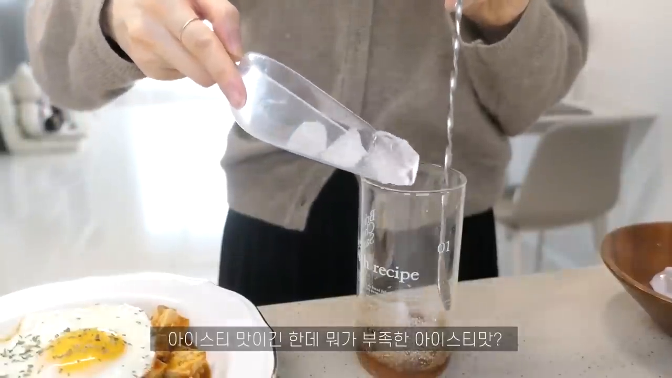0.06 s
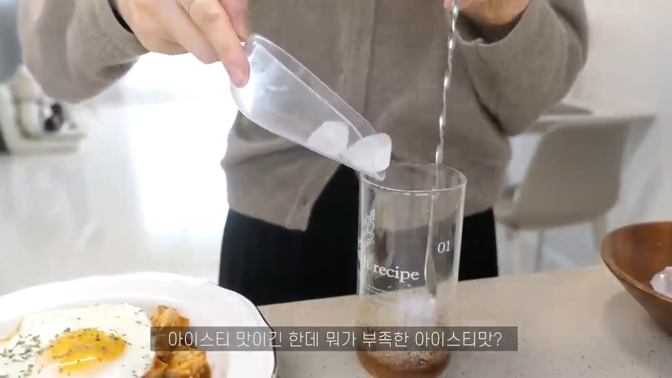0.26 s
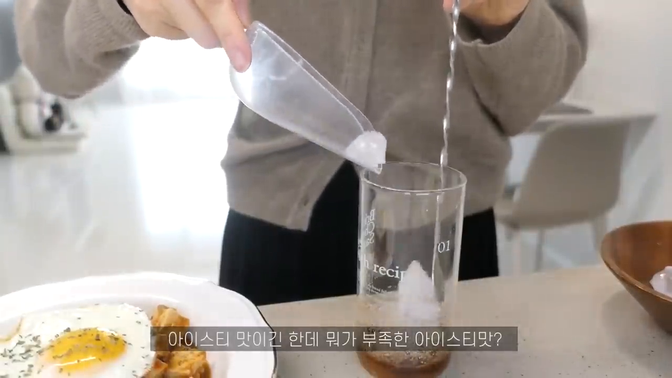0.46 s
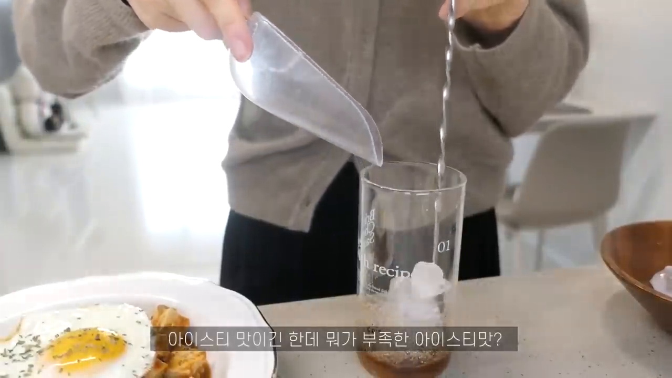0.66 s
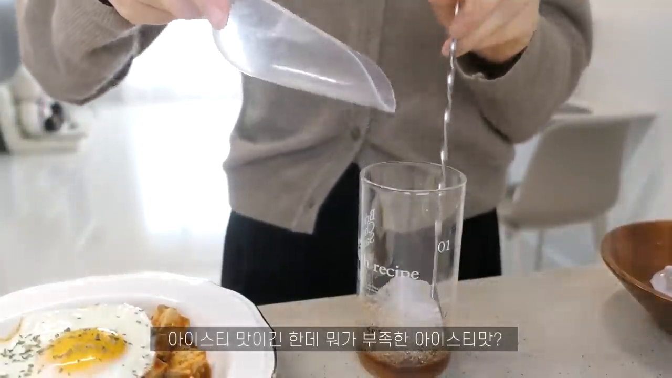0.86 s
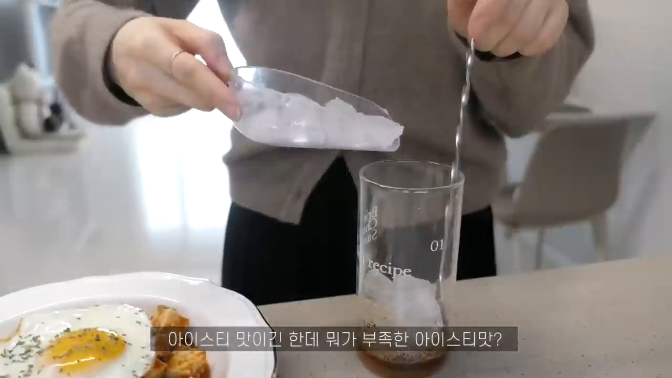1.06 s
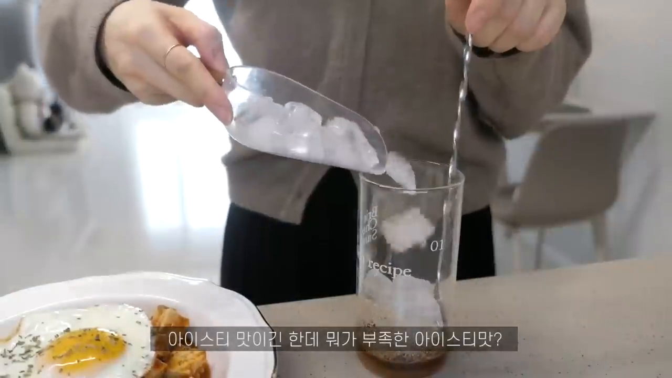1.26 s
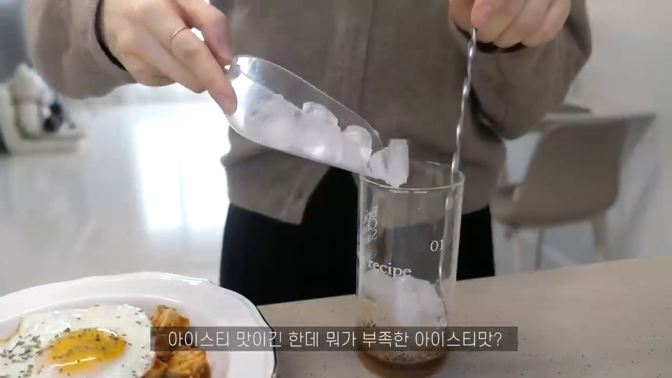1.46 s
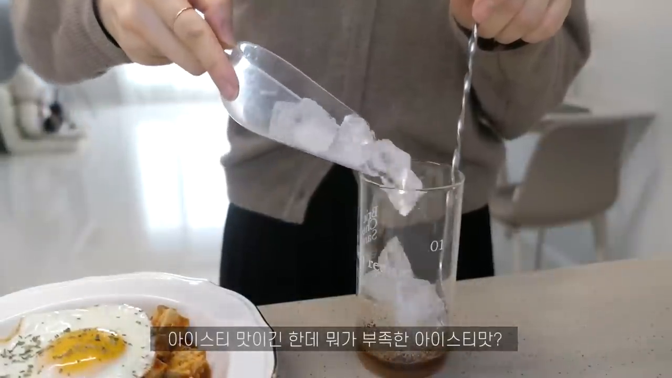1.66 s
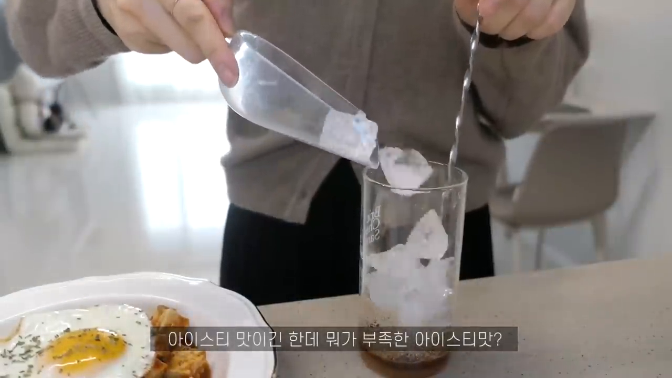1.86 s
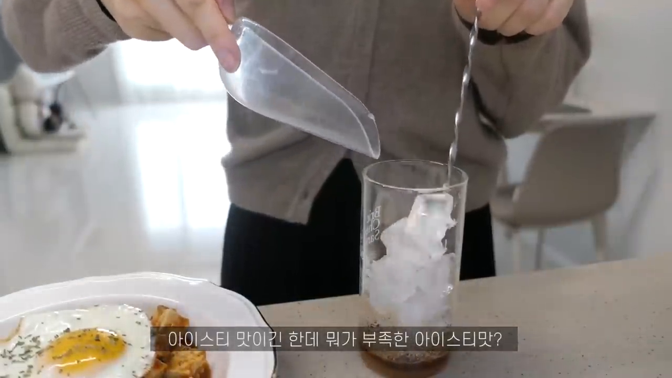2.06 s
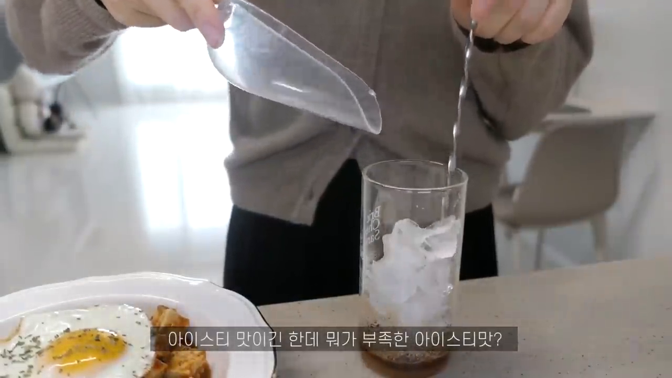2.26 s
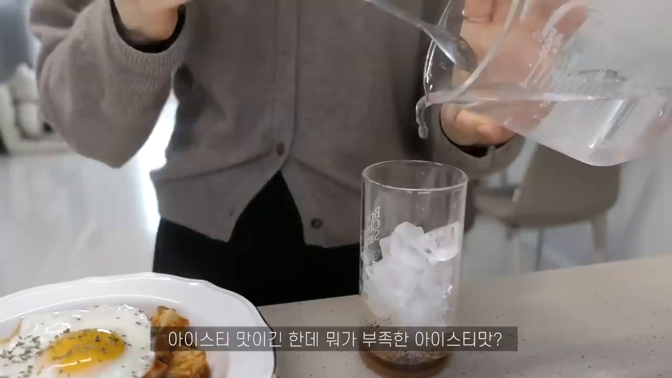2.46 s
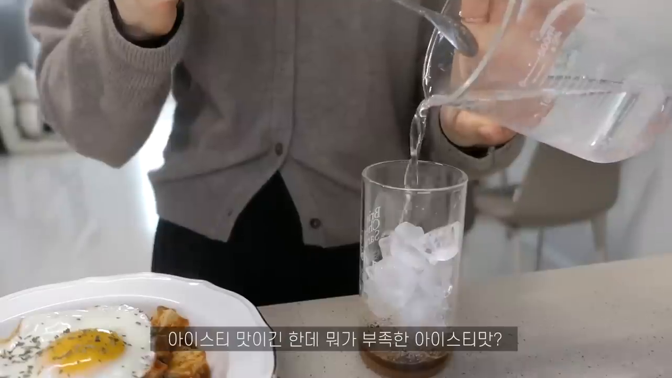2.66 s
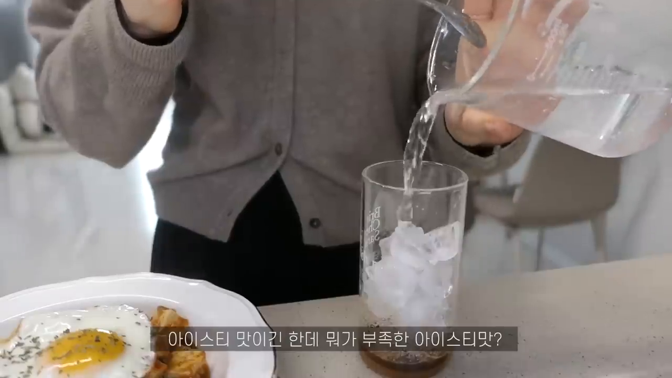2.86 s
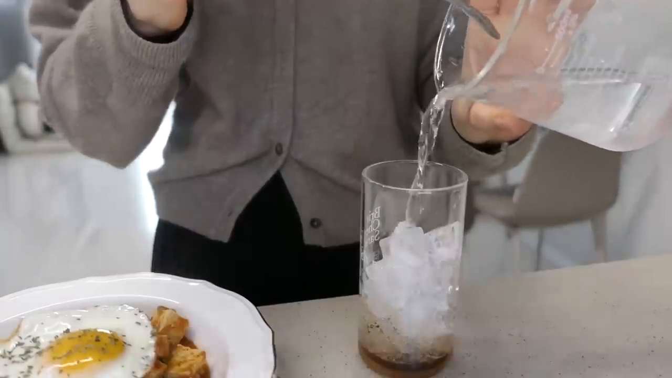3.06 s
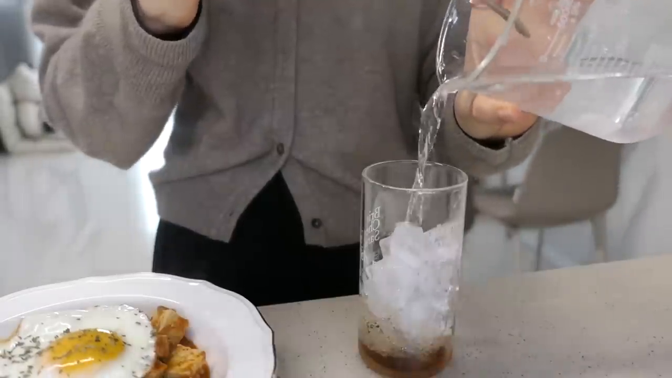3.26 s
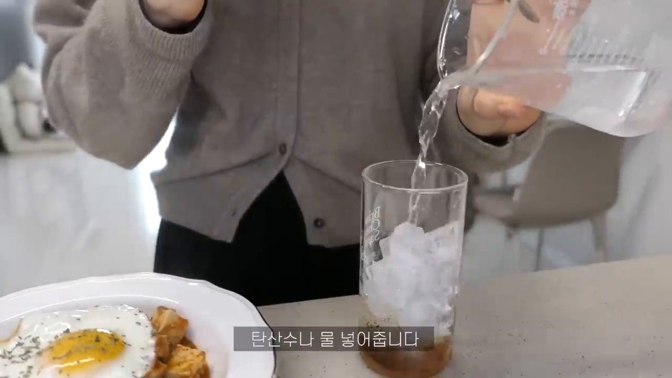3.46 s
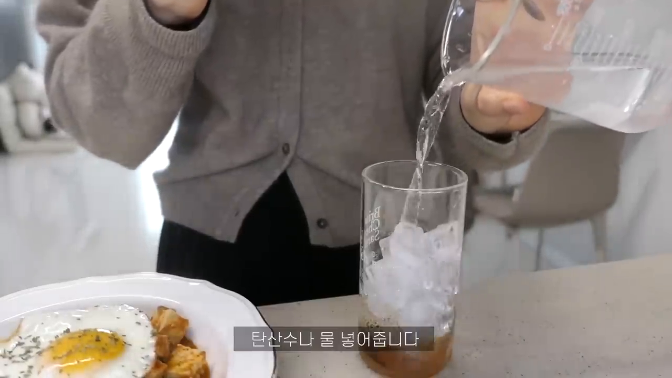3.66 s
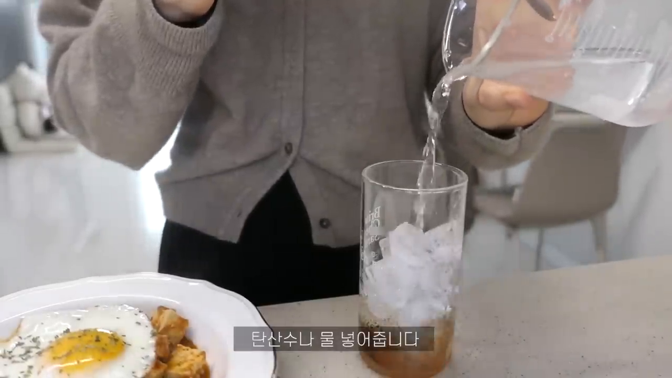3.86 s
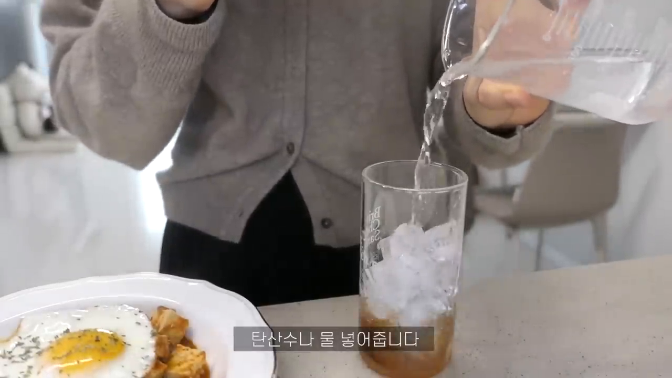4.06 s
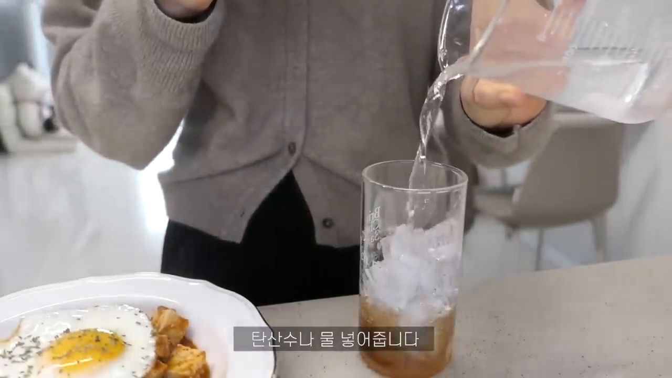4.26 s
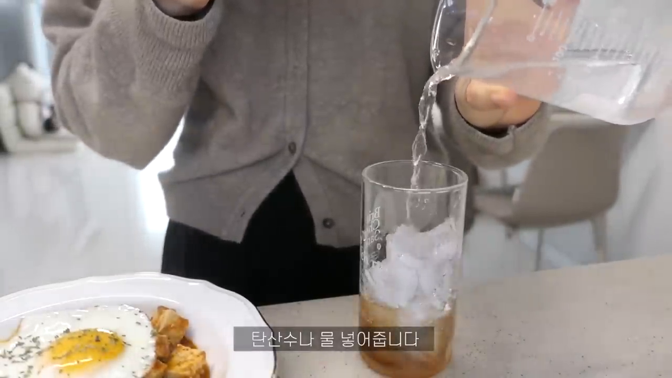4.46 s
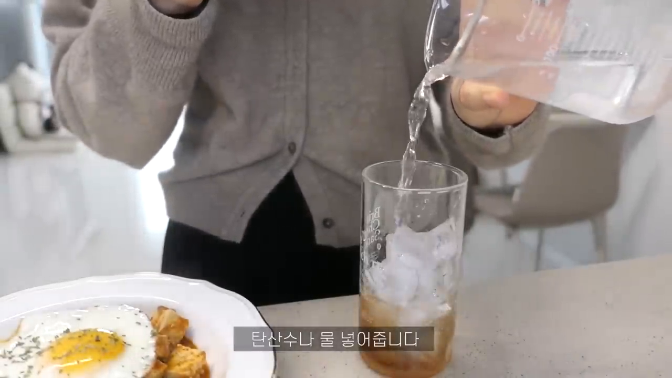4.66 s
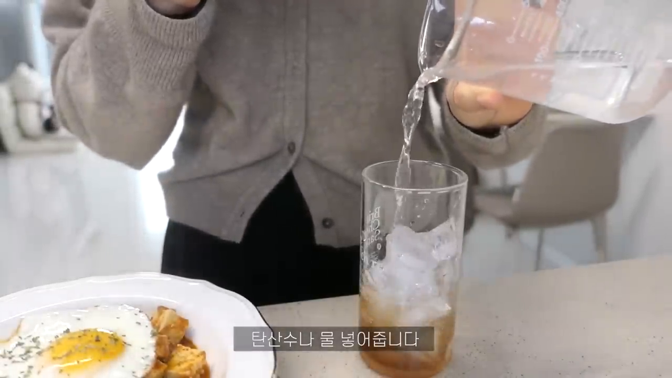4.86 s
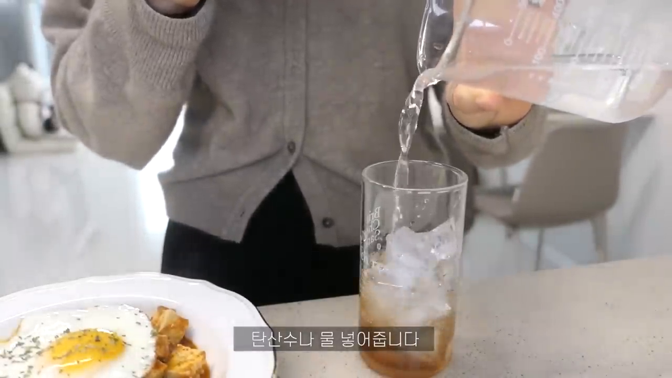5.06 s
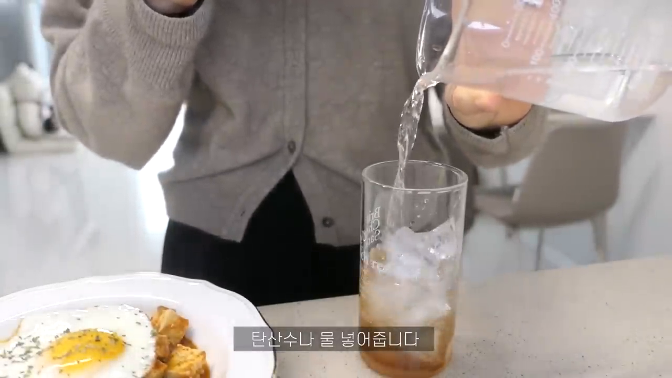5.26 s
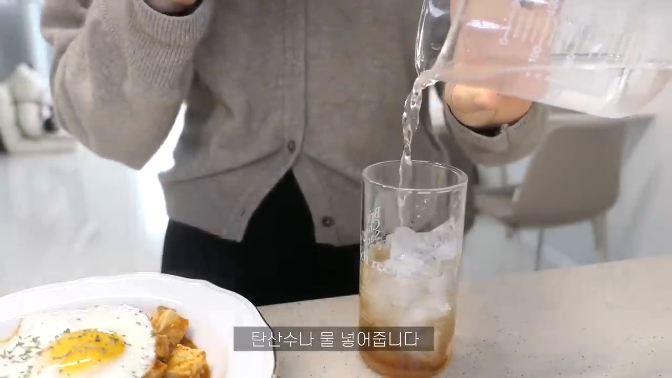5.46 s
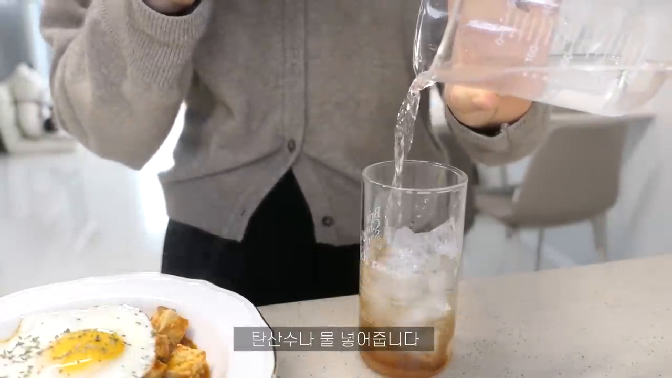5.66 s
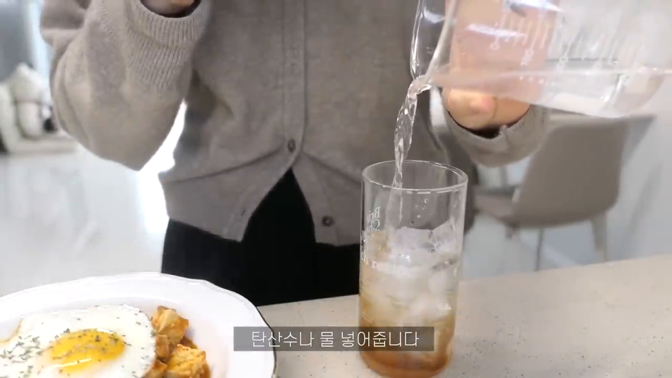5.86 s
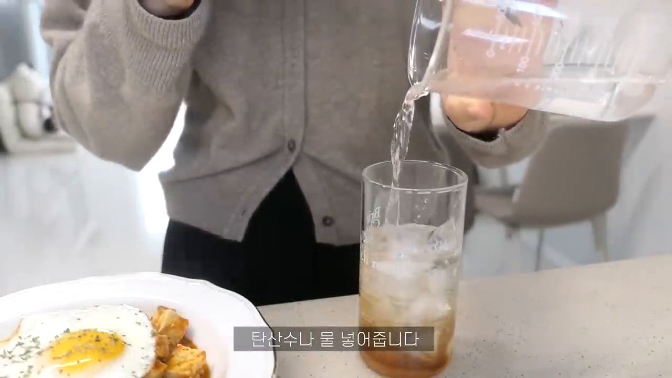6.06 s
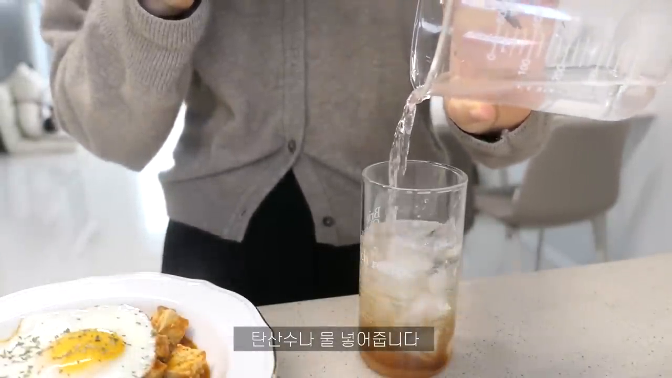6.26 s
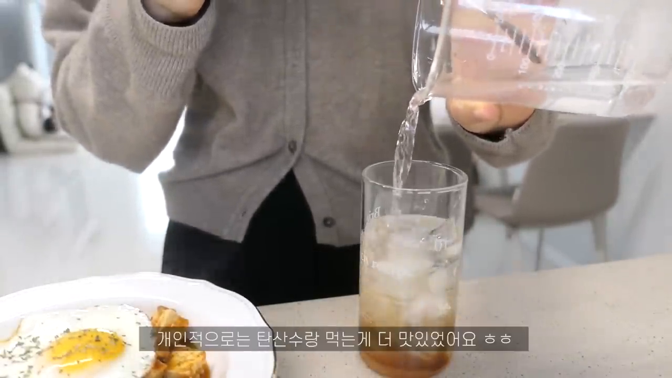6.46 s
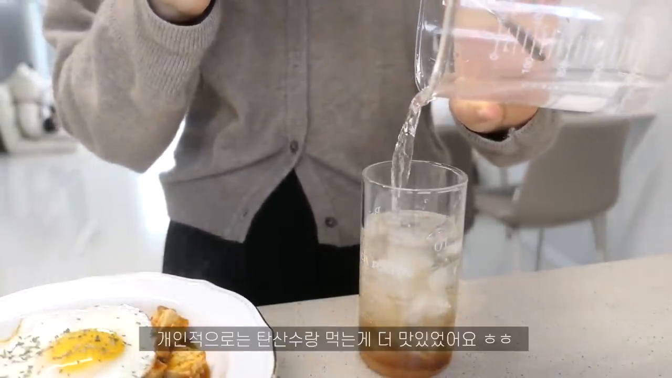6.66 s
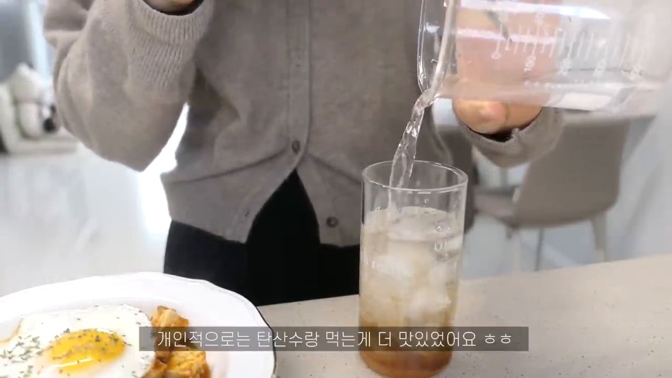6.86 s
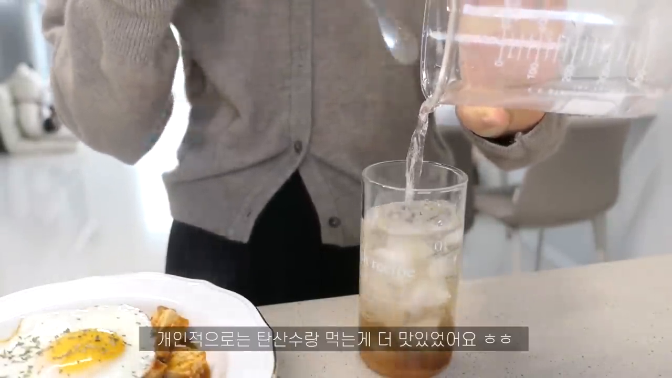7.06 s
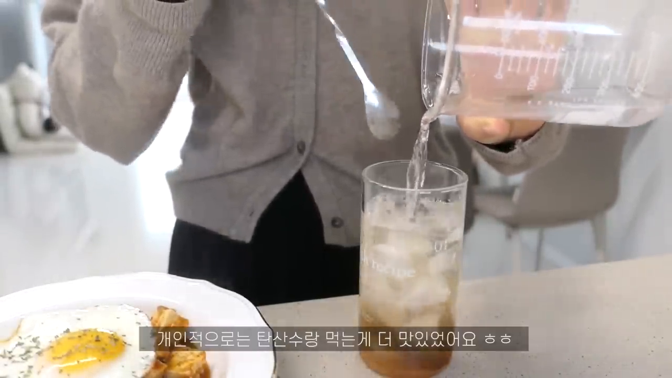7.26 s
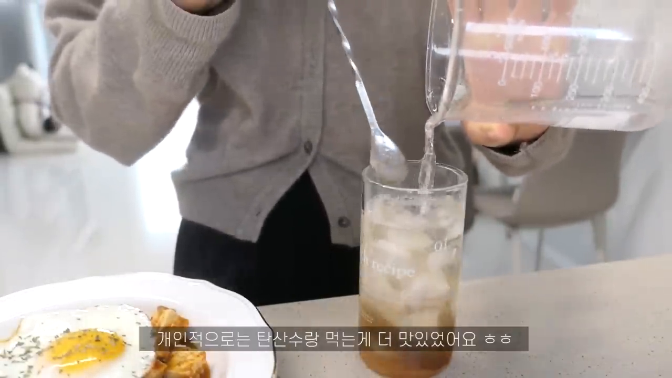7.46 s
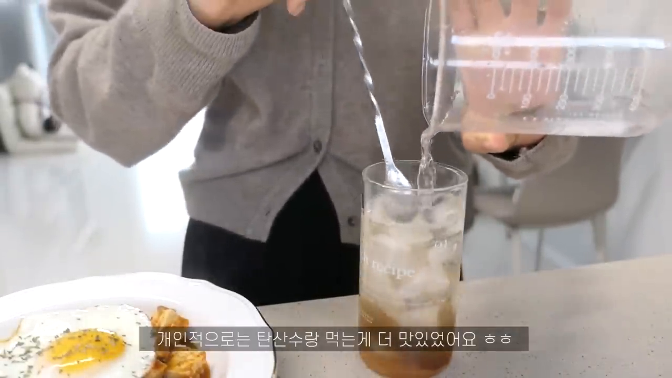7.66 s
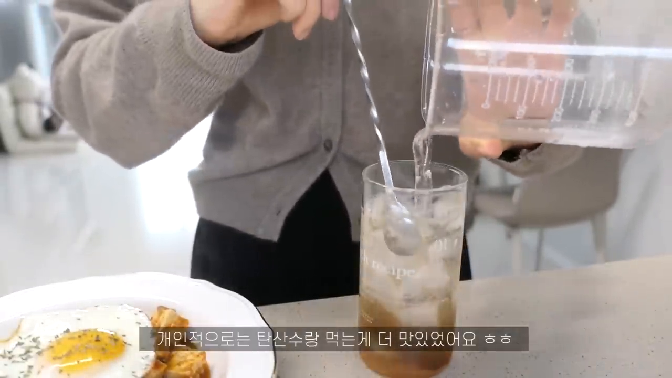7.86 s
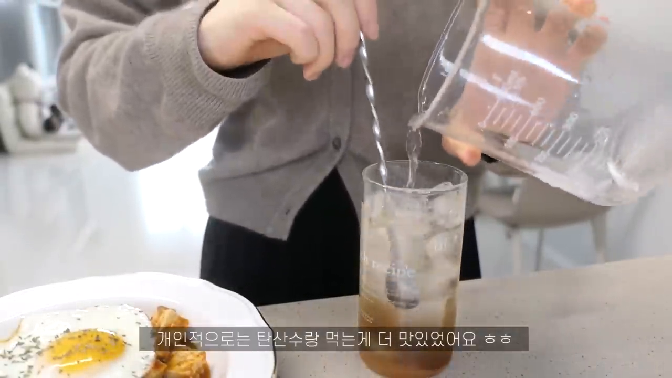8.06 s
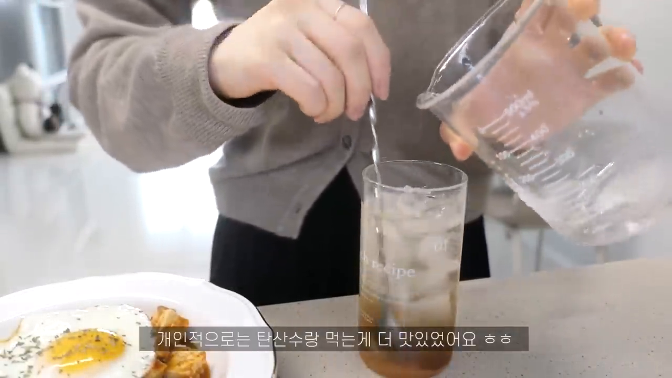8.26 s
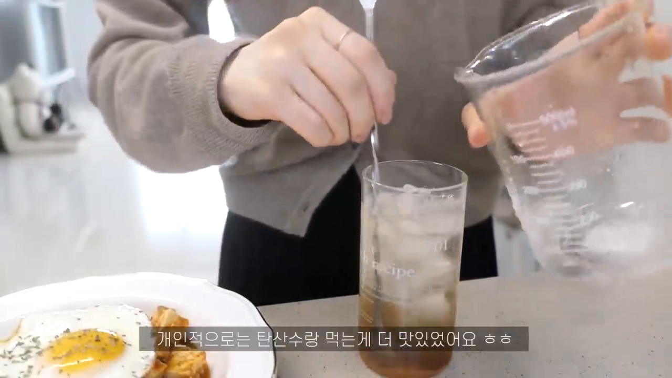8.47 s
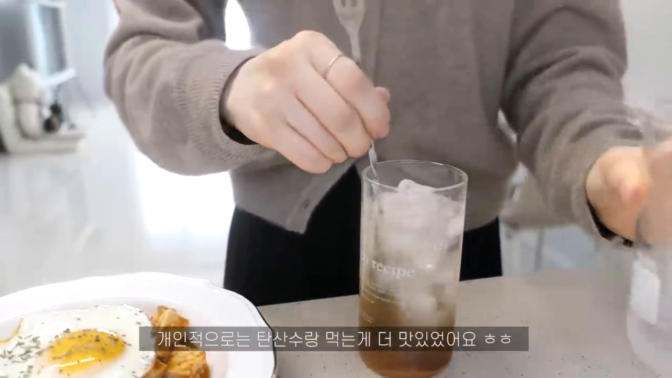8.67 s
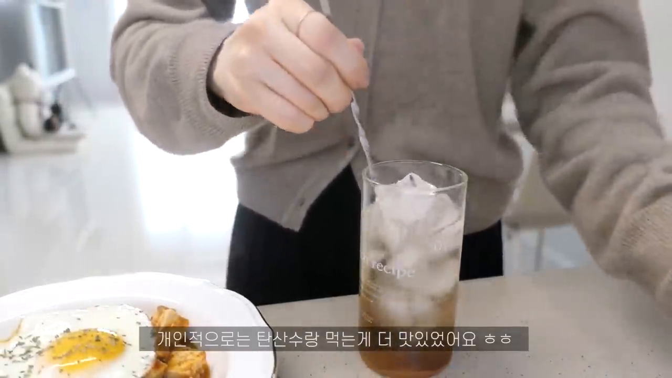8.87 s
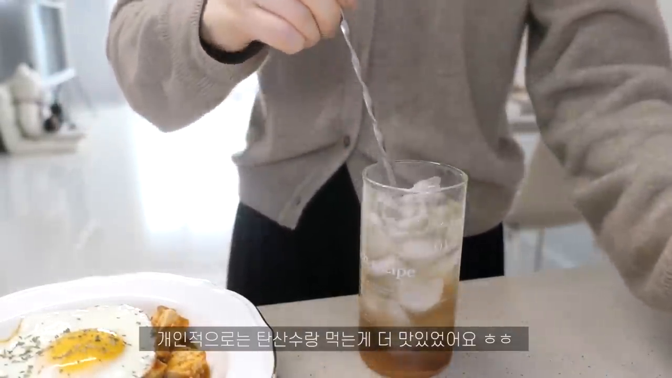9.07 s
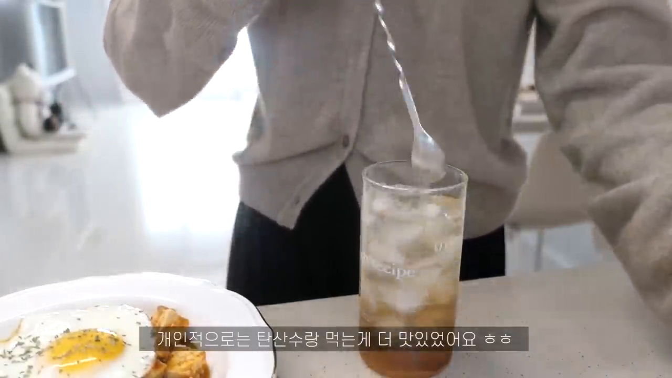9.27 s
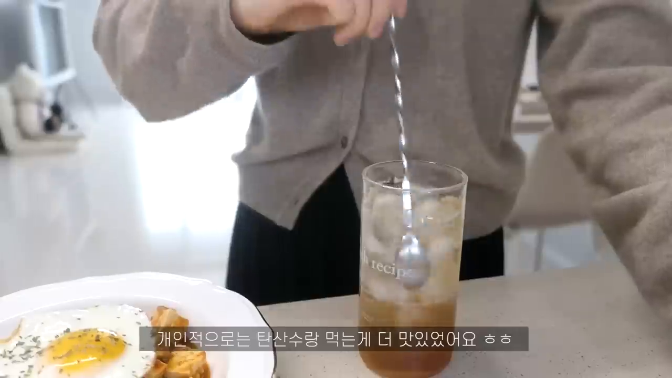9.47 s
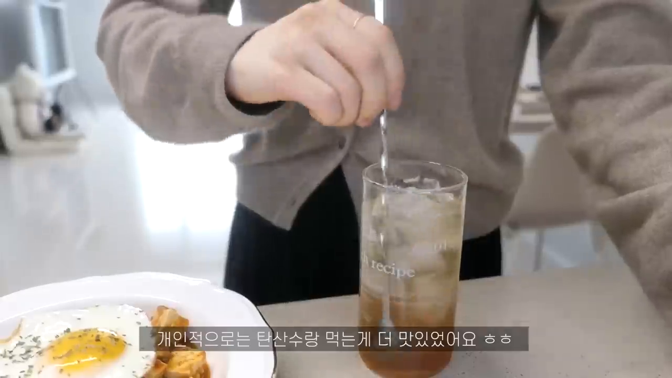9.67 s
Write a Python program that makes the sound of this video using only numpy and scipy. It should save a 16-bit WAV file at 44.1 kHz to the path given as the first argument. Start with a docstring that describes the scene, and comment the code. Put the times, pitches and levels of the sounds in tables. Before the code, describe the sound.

Close stereo microphone in a home kitchen with a short echo and faint fridge hum. Ice cubes clack and ring loudly into a dry tall glass in two loads, with small plastic scoop ticks between. Each load's ringing cuts off abruptly. Much quieter water then trickles, gurgles and splashes over the ice, before a long metal spoon stirs, knocking the cubes dully with bright ticks.

```python
"""First, ice cubes clatter into a tall dry glass in two loads, with ticks in a plastic scoop between:
each blow rings a set of fading tones. The ringing is cut off abruptly twice.
Then water is poured over them: gulps, bubbles and splashes are short chirps, with filtered noise for spray.
Last, a long spoon stirs the full glass: the cubes knock dully and the metal ticks brightly.
A fridge hums all along in a home kitchen that adds a short echo."""
import sys
import numpy as np
from scipy import signal
from scipy.fft import rfft, irfft, next_fast_len
from scipy.io import wavfile
from scipy.ndimage import uniform_filter1d, map_coordinates

SR = 44100
rng = np.random.default_rng(int(sys.argv[2]) if len(sys.argv) > 2 else 0)


def dump(signal):
    """Clip the signal to [-1, 1] and save it as 16-bit WAV at the path in sys.argv[1]."""
    limited = np.clip(np.atleast_2d(signal).T, -1, 1)
    pcm = np.round(limited * 32767).astype(np.int16)
    wavfile.write(sys.argv[1], SR, pcm)


N = 428211

# Levels of single events and tones are relative: each layer adds its own trim.
# the start, the two abrupt cuts in the ringing, and the end: time_s
CUTS = [0, 1.016, 2.502, 9.72]
# cubes hitting the dry glass and each other: start_s, clack_db, wall_ring_db, rim_ring_db, thud_db
DROPS = [(0.0024, -10, -18, -21.5, -15), (0.066, -8, -50.5, -22, -56), (0.0871, -7.5, -22, -40.5, -44),
         (0.0963, -7, -35.5, -24.5, -23), (0.255, -18, -34, -38, -45), (0.264, -3.5, -19, -12.5, -32.5),
         (0.29, -9.5, -47, -42, -25), (0.345, -35, -44, -41.5, -49), (0.369, -32.5, -36.5, -45, -41),
         (0.5077, -10, -38.5, -43, -42), (0.5154, -2, -20.5, -27.5, -24.5),
         (0.5703, -33.5, -40.5, -31.5, -50), (0.6044, -11.5, -29.5, -28, -37),
         (0.614, -3, -25, -19.5, -45.5), (0.7054, -4, -29, -26, -26), (0.8687, -20.5, -31.5, -43, -30.5),
         (0.8862, -23.5, -46, -49, -36.5), (0.9856, -26, -59, -51, -43), (0.999, -11, -37.5, -39, -34),
         (1.362, 1, -19.5, -37.5, -19), (1.3846, -7.5, -23, -26, -32.5), (1.4182, -11, -34, -31, -25.5),
         (1.4312, -13, -25, -25, -45), (1.47, -16.5, -61, -30, -34), (1.5296, -26, -48, -46.5, -30.5),
         (1.58, -36, -42.5, -48, -47), (1.614, -3.5, -24.5, -33.5, -29), (1.6432, -3, -28, -21, -21.5),
         (1.7102, -8, -32.5, -21, -46), (1.738, -16, -27, -20.5, -28), (1.785, -1.5, -31.5, -27, -33),
         (1.8079, -14.5, -35.5, -26.5, -31.5), (1.8241, -8.5, -50, -27, -29),
         (1.8532, -15.5, -29, -23.5, -29.5), (1.8767, -5, -25.5, -21, -25),
         (1.8948, -7.5, -23.5, -31.5, -21.5), (1.9102, -8, -54, -30, -33), (1.9622, -19, -32.5, -25.5, -27),
         (1.9749, -12, -24, -32, -24.5), (2.0018, -7.5, -43, -41, -21), (2.0179, -3.5, -39, -30, -27.5),
         (2.0659, -9, -41.5, -29, -25), (2.0868, -8.5, -22, -22, -17.5), (2.11, -15.5, -54, -34, -24),
         (2.164, -6.5, -30, -19.5, -45), (2.2414, -15, -42, -31, -31.5), (2.415, -8, -30.5, -57, -23)]
# cubes ticking in the plastic scoop: start_s, level_db, pitch_hz
SCOOP_TICKS = [(1.072, -33, 1390), (1.111, -15.5, 2100), (1.1398, -41, 4800), (1.1856, -14, 3800),
               (1.239, -20, 2050), (1.2528, -23.5, 2080), (1.303, -15.5, 3650), (1.314, -23.5, 1410)]
# tones of ice cubes clacking in the dry glass: pitch_hz, width_hz, level_db
DRY_CLACK = [(2040, 480, -9), (2770, 1400, 3), (4090, 580, -0.5), (5290, 590, -5), (6150, 600, -4),
             (7380, 300, -8.5), (8060, 930, -6), (12200, 230, -26.5)]
# close-packed tones that every dry clack shakes: pitch_hz, width_hz, level_db
SHIMMER = [(4710, 40, -4), (4785, 30, 0), (4870, 35, 2), (4950, 25, 0), (5023, 16, -2), (5090, 30, 0),
           (5200, 45, -1), (2945, 30, -12), (5770, 50, -11), (6400, 40, -9), (7450, 30, -6), (8200, 45, -7),
           (8650, 40, -8), (10050, 40, -10), (12100, 45, -10)]
# low ring of the dry glass wall: pitch_hz, width_hz, level_db
WALL_RING = [(1411, 12, -3), (1815, 70, 0), (2120, 70, -4), (2313, 100, -8.5), (2560, 96, -9)]
# high ring of the dry glass rim: pitch_hz, width_hz, level_db
RIM_RING = [(3911, 6, 0), (7404, 14, -12), (8090, 18, -19), (10310, 16, -20), (12400, 14, -19),
            (13850, 12, -27)]
# thud of the air in the dry glass: pitch_hz, width_hz, level_db
DRY_THUD = [(578, 79, -11), (720, 147, -0.5), (960, 350, -4)]
# the worktop under the glass: pitch_hz, width_hz, level_db
WORKTOP = [(119, 61, -2.5), (275.2, 35, -3), (329, 45, -13)]
# the water jet: time_s, gurgle_db, spray_db
JET = [(2.5, -79, -97), (2.6, -66, -62.5), (2.92, -80, -92), (3.02, -77, -69), (3.42, -83.5, -75.5),
       (3.63, -58.5, -64), (4.29, -55, -59), (4.45, -56, -55), (4.8, -46, -51.5), (5.1, -42.5, -48.5),
       (5.19, -34.5, -52), (5.36, -46.5, -48.5), (5.55, -36.5, -55.5), (5.76, -31.5, -54.5),
       (6.0, -39.5, -50.5), (6.18, -31.5, -54.5), (6.44, -43.5, -58), (7.25, -47.5, -61.5),
       (7.48, -73.5, -63.5), (7.9, -79, -67.5)]
# gulps of trapped air under the jet: start_s, level_db, pitch_hz
GULPS = [(2.83, -46, 690), (3.085, -42, 690), (3.131, -31.5, 642), (3.17, -57, 680), (3.414, -32.5, 2130),
         (3.454, -36.5, 1465), (3.553, -33.5, 1430), (3.647, -37.5, 790), (3.813, -32.5, 854),
         (3.845, -33, 946), (3.891, -29, 1825), (4.278, -26.5, 2180), (4.376, -29, 1300),
         (4.404, -22.5, 1280), (4.477, -35, 1350), (4.585, -33, 1550), (4.607, -32, 1060),
         (4.653, -34, 1560), (4.752, -21.5, 1150), (4.829, -30, 1060), (4.929, -32, 1085),
         (4.948, -27.5, 1200), (5.04, -30, 1110), (5.091, -27, 1880), (5.112, -14.5, 1094),
         (5.166, -48, 1160), (5.22, -20.5, 1320), (5.251, -20.5, 1100), (5.302, -30, 1290),
         (5.355, -32.5, 574), (5.498, -39, 1220), (5.542, -33, 654), (5.57, -30, 1250),
         (5.601, -17.5, 1226), (5.673, -36, 1220), (5.739, -39, 1190), (5.799, -38, 1160),
         (5.866, -23.5, 2120), (5.888, -22.5, 1300), (5.93, -27, 1440), (5.958, -30, 1650),
         (6.011, -27.5, 1400), (6.044, -30.5, 1240), (6.109, -23, 1495), (6.153, -30, 1410),
         (6.188, -24, 1520), (6.229, -33, 1380), (6.25, -24.5, 1450), (6.274, -35, 1430),
         (6.306, -31, 1520), (6.341, -32, 1420), (6.371, -30, 1600), (6.458, -41, 1350), (6.538, -33, 1620),
         (6.619, -35, 1570), (6.643, -33, 1740), (6.742, -30.5, 1760), (6.847, -35, 1450),
         (6.923, -24.5, 1860), (7.002, -37, 1850), (7.076, -33, 1970), (7.138, -34, 1810),
         (7.168, -34, 2070), (7.251, -37, 2020), (7.273, -30.5, 1870), (7.326, -30.5, 1980),
         (7.421, -40, 1940)]
# splashes and cracks on the ice: start_s, level_db, pitch_hz
SPLASHES = [(2.6635, -37.5, 7700), (2.8143, -39, 10600), (2.857, -35, 5300), (2.935, -35, 5640),
            (2.986, -30.5, 5940), (3.011, -31.5, 6200), (3.0337, -34, 4400), (3.0894, -36, 2590),
            (3.1096, -33.5, 10000), (3.1354, -36, 6400), (3.169, -31.5, 4370), (3.3248, -34, 12100),
            (3.3925, -33, 6500), (3.453, -29.5, 9100), (3.5187, -26.5, 10400), (3.5698, -29.5, 8850),
            (3.615, -39, 7140), (3.6669, -40, 6250), (3.7494, -29.5, 3240), (3.7886, -34, 9540),
            (3.8092, -25, 6100), (3.89, -20, 3950), (3.9498, -35, 6960), (3.9813, -32, 3620),
            (4.1054, -42, 8800), (4.2618, -29, 5470), (4.281, -26, 3870), (4.382, -26, 7250),
            (4.405, -32, 3930), (4.439, -34, 5040), (4.4716, -36, 3560), (4.557, -33.5, 3740),
            (4.5903, -32, 6030), (4.6667, -36, 6400), (4.7487, -33, 8400), (4.829, -31, 6700),
            (4.8485, -17, 4870), (4.948, -21, 2630), (4.9843, -14, 4200), (5.058, -26, 2600),
            (5.21, -19, 2850), (5.0411, -21, 5060), (5.0968, -22.5, 2880), (5.147, -21.5, 4240),
            (5.169, -22, 3000), (5.1952, -19, 4200), (5.2726, -22.5, 4530), (5.3257, -28, 4440),
            (5.353, -31, 4340), (5.418, -28, 6450), (5.483, -22.5, 7360), (5.516, -17.5, 7700),
            (5.571, -28.5, 3170), (5.597, -29, 4860), (5.67, -26.5, 4970), (5.692, -24, 5180),
            (5.7282, -19, 4950), (5.7994, -20, 4620), (5.852, -22.5, 4030), (5.8673, -19.5, 2550),
            (5.91, -14.5, 3850), (5.88, -21.5, 9800), (5.959, -23.5, 3100), (5.985, -27, 9100),
            (6.045, -23, 2120), (6.119, -27.5, 2980), (6.25, -29.5, 9800), (6.161, -24, 2520),
            (6.37, -27, 3570), (6.5369, -54, 2620), (6.7417, -33, 3600), (7.019, -36, 2900),
            (7.082, -29.5, 4370), (7.126, -27, 3980), (7.175, -34.5, 5030), (7.3253, -26.5, 2620),
            (7.3883, -27.5, 10100), (7.5185, -45, 5400)]
# the pieces each splash breaks into: late_s, pitch_ratio, length_cycles, level_db
SPLASH_PIECES = [(0, 1, 30, -5), (0, 1.7, 10, -12), (.003, .62, 14, -10)]
# filling air pockets between cubes: from_s, to_s, from_hz, to_hz, level_over_gurgle_db
POCKETS = [(3.95, 4.72, 1217, 1600, 4), (4.348, 5.441, 980, 1129, 0), (4.84, 5.303, 2540, 3180, -3.5),
           (5.4, 5.95, 3230, 3270, -10)]
# tone colour of the spray: pitch_hz, relative_level_db (per Hz)
SPRAY_COLOUR = [(1180, -6), (2000, 9.5), (3190, -46), (3700, 0), (4650, 2.5), (7890, 2.5), (9400, 3.5),
                (15000, -7), (16400, -40.5)]
# cubes and spoon knocking in the drink: start_s, clack_db, wall_ring_db, thud_db
KNOCKS = [(3.5486, -53, -45, -56), (4.1274, -60, -54, -43.5), (4.2821, -23.5, -40, -38),
          (4.3984, -32, -36, -47), (5.3537, -29, -59, -52), (5.5995, -31, -32, -46),
          (5.6243, -31, -47, -35), (6.2273, -35, -48, -45), (7.7284, -40, -64, -77),
          (7.9529, -40, -53, -50), (8.0185, -29.5, -46, -46), (8.0359, -24.5, -52, -40),
          (8.0631, -19.5, -31.5, -33), (8.0713, -19, -39, -39.5), (8.1356, -41, -29.5, -46),
          (8.1537, -49, -33, -64), (8.2032, -32, -43, -57), (8.227, -47, -36, -57),
          (8.2613, -34, -35.5, -56), (8.309, -50, -35, -41), (8.3667, -24, -29.5, -41),
          (8.4333, -30, -22.5, -26), (8.5682, -33.5, -22, -30), (8.59, -21, -26.5, -44),
          (8.6117, -20, -38, -36), (8.6437, -15, -21, -33), (8.6608, -26.5, -30, -36.5),
          (8.703, -19, -44, -48), (8.731, -18, -28, -51), (8.769, -24, -38, -43), (8.8153, -35.5, -42, -43),
          (8.8334, -23, -36, -45), (8.8905, -12.5, -41, -51), (8.901, -13.5, -37, -47),
          (8.9155, -15.5, -17.5, -42), (8.933, -13, -26.5, -37), (8.9524, -16.5, -44, -45),
          (8.9859, -38.5, -31, -42), (9.0525, -18.5, -33.5, -44), (9.111, -14.5, -48, -46),
          (9.1503, -25.5, -36, -51), (9.1934, -29, -37, -52), (9.2156, -33, -32, -44),
          (9.2281, -11, -50, -45), (9.2664, -21.5, -36, -54), (9.3189, -33, -35, -47),
          (9.348, -34, -45, -66), (9.4312, -15, -41, -45), (9.4483, -31, -31, -36), (9.4949, -21, -14, -13),
          (9.5315, -14.5, -26, -29), (9.5655, -20, -31, -45), (9.5776, -24, -40, -47),
          (9.5925, -36, -35, -28.5), (9.6066, -11.5, -27, -30), (9.672, -29, -49, -44)]
# floating cubes jostling round the spoon: time_s, level_db
STIR = [(7.9, -61), (8.01, -65), (8.04, -42), (8.3, -45.5), (8.55, -55.5), (8.575, -32.5), (8.66, -32),
        (8.72, -38.5), (8.86, -37), (8.92, -37), (9.1, -42), (9.42, -57), (9.5, -45), (9.71, -43.5)]
# tones of cubes clacking in the drink: pitch_hz, width_hz, level_db
WET_CLACK = [(920, 950, -26), (2340, 340, -2.5), (3560, 1500, 14.5), (5140, 1800, 11.5), (6800, 1500, 4),
             (11180, 12000, 0)]
# ring of the glass wall loaded by the drink: pitch_hz, width_hz, level_db
WET_RING = [(1330, 130, -5), (1450, 85, 1), (1710, 90, -2), (1920, 130, -1), (2060, 130, 1), (2210, 110, 4),
            (2450, 150, -3), (2930, 700, 0)]
# thud in the full glass: pitch_hz, width_hz, level_db
WET_THUD = [(568, 39.6, 0.5), (684, 83, -2.5), (790, 90, -0.5), (893, 126, -0.5), (1084, 200, -0.5),
            (397, 110, -2.5)]
# the spoon's metal ticking on ice and glass: start_s, level_db
SPOON_TICKS = [(7.9515, -37.5), (8.0351, -34), (8.0717, -20.5), (8.4312, -29.5), (8.5674, -38),
               (8.6123, -34), (8.891, -39.5), (8.9508, -36), (9.0688, -30), (9.1109, -29), (9.227, -42),
               (9.2734, -39), (9.432, -14.5), (9.5322, -32)]
# tones of each spoon tick and its rebound: late_s, pitch_hz, level_db
TICK_TONES = [(0, 9030, 3), (0, 6340, 0.5), (.004, 12000, -4)]
# how long the kitchen echoes: pitch_hz, time_to_fade_60_db_s
KITCHEN_FADE = [(150, 0.3), (400, 0.56), (1000, 0.54), (3000, 0.47), (8000, 0.36), (15000, 0.26)]
# how wide the echo spreads: pitch_hz, side_over_mid_db
KITCHEN_WIDTH = [(60, 3.5), (300, -0.5), (1000, -4.5), (4000, -7), (9000, -6.5), (15000, 2)]
# tone colour of the room noise: pitch_hz, relative_level_db (per Hz)
AIR_COLOUR = [(15, -64.5), (25, -26), (80, -18), (150, -5), (202, -14), (251, -5), (320, -11.5), (357, 0.5),
              (387, -12.5), (898, -16), (1280, -21), (1870, -23.5), (3990, -34), (7060, -27.5),
              (16400, -41.5)]
# fridge hum: pitch_hz, peak_level_db
HUM = [(157, -73), (259, -87.5), (359, -71.5)]

# Settings; names with _FADE_S are times to fall by 60 dB.
SCATTER_DB = 2.5  # typical random change in the strength of each tone
RATTLE_DB, RATTLE_FADE_S = -13, 0.042  # quick rattle, below the blow
SETTLE_DB, SETTLE_FADE_S = -28.5, 0.99  # slow settling, below the blow
PILE_DAMPING = 0.8  # share of tone widening per cubed second, as the ice piles up
RESTING_HZ = 30  # resting cubes widen the tones that scraping excites
AIR_CM, RISE_CM_PER_S = 12.5, 1.707  # air above the drink when pouring starts; how fast the drink climbs
FROTH_DB, FROTH_FADE_S = -9.5, 0.065  # bubbles after a gulp, below it
MIST_DB, MIST_FADE_S = -17.5, 0.0435  # spray after a splash, below it
TRAIL_S, TRAIL_DB = 0.046, -6.5  # droplets after a splash or gulp: longest delay, loudest level below it
DULL_S, DULL_HZ, DULL_WIDTH_HZ = (5.2, 5.9), (3070, 3880), 1080  # a dull band moves up as the glass fills
JOSTLE_DB, JOSTLE_FADE_S = -26, 0.22  # burst after a knock, below it
BUMP_DB = -8  # worktop level against the dry thud
WET_BUMP_SHARE, WET_BUMP_DB = 0.68, -12  # worktop in the drink: share of the thud's dB, plus an offset
AFLOAT_DB = -1.5  # the worktop is weaker while no spoon pushes
LATE_S, LATE_LIFT = 9.47, 0.12  # in the last knocks, from this time on, the thud is higher by this share
SIZZLE_DB, SIZZLE_FADE_S = -18.5, 0.052  # thin hiss after a tick, below it
AIR_DB = -53  # room noise
BASS_HZ = 100  # small objects give off little sound below this
TOP_HZ = 16400  # nothing is kept above this


def loading():
    """Cubes clack, ring wall and rim, thud on the pile and rattle to rest; the scoop ticks between loads."""
    s, clack, wall, rim, thud = np.transpose(DROPS)
    scoop_s, scoop_db, scoop_hz = np.transpose(SCOOP_TICKS)
    ticks = 0
    for ratio, drop_db in [(1, -3), (1.5, -5.5), (2.6, -21), (4.1, -15)]:
        cycles = np.full(len(scoop_hz), 5.)
        ticks = ticks + bubbles(scoop_s, scoop_db + drop_db, ratio * scoop_hz, cycles, rise=0)

    # a faint steady rustle, from the first cut to the next drop
    t = np.arange(N) / SR
    rustle = amp(-49.5) * (t > CUTS[1]) * (t < s[s > CUTS[1]][0])
    blows, force = np.r_[s, scoop_s], np.r_[clack, scoop_db]
    rattle = aftermath(blows, force + RATTLE_DB, RATTLE_FADE_S)
    settling = aftermath(s, clack + SETTLE_DB, SETTLE_FADE_S)
    bodies = [(DRY_CLACK, -8), (WALL_RING, -19), (RIM_RING, -17),
              (SHIMMER, -11), (DRY_THUD, -19), (WORKTOP, -25)]
    tumble = scrape(rustle + rattle + settling, bodies, rate=2100, spread_db=1, clump_db=7.5)

    return (rings(s, clack - 5, -.4, DRY_CLACK, detune=0.034, grind=0.0039)
            + rings(s, clack - 6, -.4, SHIMMER, detune=0.0043, grind=0.0017,
                    damping=PILE_DAMPING / 2, choke=0.15)
            + rings(s, wall + 7, -1.4, WALL_RING, detune=0.00088, grind=.00004,
                    damping=PILE_DAMPING, choke=0.72)
            + rings(s, rim + 4, -.6, RIM_RING, detune=0.00094, grind=.00004,
                    damping=PILE_DAMPING, choke=0.66)
            + rings(s, thud + 3, -1.4, DRY_THUD, detune=0.042, grind=0.00051)
            + rings(s, thud + BUMP_DB, -1.23, WORKTOP, detune=0.03, grind=0.00027)
            + tumble + ticks)


def pour():
    """The jet drags air under, which chirps as bubbles; gulps and splashes stir up more froth and spray."""
    gurgle, spray = amp(curves(JET, np.arange(N) / SR))
    s, db, _ = np.transpose(GULPS)
    gurgle = gurgle + aftermath(s, db + FROTH_DB, FROTH_FADE_S)
    s, db, _ = np.transpose(SPLASHES)
    spray = spray + aftermath(s, db + MIST_DB, MIST_FADE_S)
    water = gulps() + splashes() + gurgling(gurgle) + air_pockets(gurgle) + spraying(spray)
    return filling_glass(water) * sides(-1.1)[:, None]


def gulps():
    """Each trapped gulp of air rings at its own pitch and sheds smaller bubbles."""
    s, db, hz = np.transpose(GULPS)
    main = bubbles(s, db + 1.5, hz, np.full(len(s), 13.), rise=0.03)
    return main + trail(s, db - 1, hz, spread=0.078, count=6)


def splashes():
    """Each splash breaks into short chirps and sheds droplets."""
    s, db, hz = np.transpose(SPLASHES)
    water = trail(s, db, hz, spread=0.17, count=8)
    for late, ratio, cycles, drop_db in SPLASH_PIECES:
        water += bubbles(s + late, db + drop_db, ratio * hz, np.full(len(s), cycles), rise=0.047)
    return water


def gurgling(gurgle):
    """One swarm of bubbles gathers near the pitch of the air column; another spreads widely around it."""
    s, db, a, b, air_hz = swarm(count=1400, flow=gurgle, spread_db=3.0)
    near_column = bubbles(s, db - 9.5, air_hz * np.exp(0.48 * (a - .45)), 8 + 12 * b, rise=0.22)
    s, db, a, b, air_hz = swarm(count=900, flow=gurgle, spread_db=-1.0)
    spread_out = bubbles(s, db - 3.5, air_hz * np.exp(2.64 * (a - .35)), 4 + 9 * b, rise=0.16)
    return near_column + spread_out


def air_pockets(gurgle):
    """Air pockets between the cubes fill up, so the pitch of their bubbles climbs."""
    s, db, a, b, _ = swarm(count=1100, flow=gurgle, spread_db=-1.0)
    water = 0
    for t0, t1, hz0, hz1, over_db in POCKETS:
        k = (s > t0) & (s < t1)
        hz = np.interp(s[k], (t0, t1), (hz0, hz1)) * np.exp(0.12 * (b[k] - .5))
        water = water + bubbles(s[k], db[k] + over_db, hz, 14 + 12 * a[k], rise=0.027)
    return water


def spraying(spray):
    """Spray crackles as small high chirps over a fizz of clumped, filtered clicks."""
    s, db, a, b, _ = swarm(count=2000, flow=spray, spread_db=5.0)
    crackle = bubbles(s, db - 0.5, 2300 * np.exp(1.91 * a ** 1.453), 12 + 30 * b, rise=0.1)
    clicks = grit(rate=2200, spread_db=0.0, clump_db=13)
    fizz = unit(filtered(clicks, lambda hz: amp(along(SPRAY_COLOUR, hz))))
    t = np.arange(N) / SR
    pouring = (t > JET[0][0]) * (t < JET[-1][0])
    return crackle + pouring * spray * amp(-2.0) * fizz


def filling_glass(water):
    """As the glass fills, a dull band fades over into a higher one and the rim starts to ring along."""
    t = np.arange(N) / SR
    full = np.interp(t, DULL_S, (0, 1))
    dulled = 0
    for share, centre in zip((1 - full, full), DULL_HZ):
        dip = lambda hz: 1 - 0.41 * np.exp(-(2 * (hz - centre) / DULL_WIDTH_HZ) ** 2)
        dulled = dulled + share * filtered(water, dip)
    # the rim's tone at 3700 Hz, 25 Hz wide, fades in from 5.5 s to 6.5 s
    rim = lambda hz: 2.2j * hz * 25 / (3700 ** 2 - hz * hz + 1j * hz * 25)
    return dulled + filtered(dulled * np.clip(t - 5.5, 0, 1), rim)


def stirring():
    """In the drink the wall rings short and the cubes knock dull and jostle."""
    s, clack, ring, thud = np.transpose(KNOCKS)
    t = np.arange(N) / SR
    churn = amp(curves(STIR, t)[0]) * (t > STIR[0][0])
    churn = churn + aftermath(s, clack + JOSTLE_DB, JOSTLE_FADE_S)
    bodies = [(WET_CLACK, -7), (WET_RING, -6), (WET_THUD, -10), (WORKTOP, -19)]
    jostle = scrape(churn, bodies, rate=2200, spread_db=3.0, clump_db=5.5)
    jostle = filtered(jostle, lambda hz: 1 / (1 + 1j * hz / 7000) ** 2)  # muffled by the drink
    bump = WET_BUMP_SHARE * thud + WET_BUMP_DB + AFLOAT_DB * (s < STIR[0][0])
    return (rings(s, clack - 3, -1.2, WET_CLACK, detune=0.12, grind=0.0054)
            + rings(s, ring + 3, -2.6, WET_RING, detune=0.058, grind=0.0075)
            + rings(s, thud + 5, -2.2, WET_THUD, detune=0.027, grind=0.00071,
                    lift=LATE_LIFT * (s > LATE_S))
            + rings(s, bump, -1.5, WORKTOP, detune=0.033, grind=0.00038)
            + jostle)


def spoon():
    """Metal gives short bright ticks, each with a small rebound and a thin hiss."""
    s, db = np.transpose(SPOON_TICKS)
    hiss_gain = aftermath(s, db + SIZZLE_DB, SIZZLE_FADE_S)
    sound = scrape(hiss_gain, [([(10670, 5600, 0)], 0)], rate=6000, spread_db=1.5, clump_db=5)
    for late, hz, drop_db in TICK_TONES:
        pitch, cycles = np.full(len(s), float(hz)), np.full(len(s), 4.)
        sound = sound + bubbles(s + late, db + drop_db, pitch, cycles, rise=0)
    return sound


def kitchen(x):
    """The walls answer with fading noise, new for each fifth of a second and stopped at each cut."""
    out, step = np.zeros((2, N + SR)), SR // 5
    for t0, t1 in zip(CUTS, CUTS[1:]):
        end = min(int(t1 * SR), N)
        for k in range(int(t0 * SR), end, step):
            hz, t, z = signal.stft(rng.standard_normal((2, SR // 2)), SR, nperseg=256)
            z[1] *= amp(along(KITCHEN_WIDTH, hz))[:, None]
            fade = amp(-60 * t / along(KITCHEN_FADE, hz)[:, None])
            mid, side = signal.istft(z * fade, SR, nperseg=256)[1]
            tail = np.array([mid + side, mid - side]) / np.linalg.norm(mid)
            wet = signal.fftconvolve(x[None, k:min(k + step, end)], tail, axes=1)[:, :end - k]
            out[:, k:k + wet.shape[1]] += wet
    return out[:, :N]


def fridge():
    """Room noise, slightly alike in both ears, and hum tones that waver in level and pitch."""
    noise = rng.standard_normal((2, N)) + 0.053 * rng.standard_normal(N)
    noise = unit(filtered(noise, lambda hz: amp(along(AIR_COLOUR, hz))))
    sound = amp(AIR_DB + 0.63 * wobble(28.0)) * noise
    t = np.arange(N) / SR
    for hz, db in HUM:
        sound = sound + amp(db + 2.5 * wobble(0.95)) * np.sin(2 * np.pi * hz * t + 1.7 * wobble(7.7))
    return sound


def rings(s, db, pan_db, modes, detune, grind, damping=0., choke=0., lift=0.):
    """Each blow grinds briefly and rings the tones; piled ice damps later blows, the next contacts choke them."""
    out = np.zeros((2, N + SR))
    hz, width, level = np.transpose(modes)[:, :, None]
    t = np.arange(int(SR * min(2.2 / width.min(), .45))) / SR
    luck = rng.standard_normal((len(s), 2, len(hz), 1))
    drag = 1 + damping * s ** 3
    grind_fade = np.exp(-np.arange(500) / (SR * grind * drag[:, None]))
    rough = rng.standard_normal((len(s), 500)) * grind_fade
    for when, peak, (size, pitch), push, up, slow in zip(s, db, luck, rough, lift + 0 * s, drag):
        fade = np.exp(-np.pi * width * slow * t) * (1 - np.exp(-hz * t))  # builds over a cycle
        tone = np.sin(2 * np.pi * hz * (1 + up + detune * pitch) * t)
        ring = (amp(level + SCATTER_DB * size) * tone * fade).sum(0)
        ring = signal.fftconvolve(ring, push)[:int(SR * until_cut(when))]
        # count the later contacts; each one takes away part of the ring
        order = np.sort(s)
        touches = np.searchsorted(order, when + np.arange(len(ring)) / SR) - np.searchsorted(order, when) - 1
        hold = uniform_filter1d((1. - choke) ** np.clip(touches, 0, None), size=64)
        ring = ring / abs(ring).max() * hold
        out[:, int(when * SR):][:, :len(ring)] += amp(peak) * sides(pan_db)[:, None] * ring
    return out[:, :N]


def bubbles(s, db, hz, cycles, rise):
    """Fading tones whose pitch climbs by the rise, as when a bubble nears the surface."""
    u = np.arange(1200) / SR * hz[:, None] / cycles[:, None]  # age in lifetimes
    wave = np.sin(2 * np.pi * cycles[:, None] * (u + rise * u * u / 2))
    wave = wave * np.exp(-3 * u) * (1 - np.exp(-25 * u))
    at = (s * SR).astype(int)[:, None] + np.arange(1200)
    return np.bincount(at.ravel(), (amp(db)[:, None] * wave).ravel(), N + 1200)[:N]


def swarm(count, flow, spread_db):
    """Random times, levels following the flow, two more random draws, and the quarter-wave air column pitch."""
    luck = rng.random((count, 4))
    s = JET[0][0] + (JET[-1][0] - JET[0][0]) * luck[:, 0]
    air_hz = 34300 / (4 * (AIR_CM - RISE_CM_PER_S * (s - JET[0][0])))  # sound travels 34300 cm/s
    flow_db = 20 * np.log10(flow) + 5 * np.tanh(wobble(13))  # air is dragged under in bursts
    db = flow_db[(s * SR).astype(int)] - spread_db * np.log(luck[:, 1] + 1 / 50)
    return s, db, luck[:, 2], luck[:, 3], air_hz


def trail(s, db, hz, spread, count):
    """Each event sheds a few fading bubbles near its own pitch."""
    late, pitch, size = np.moveaxis(rng.random((len(s), count, 3)), 2, 0)
    level = db[:, None] + TRAIL_DB - 12 * late - 8 * size
    tone = hz[:, None] * np.exp(spread * (pitch - .5))
    when = s[:, None] + TRAIL_S * late
    return bubbles(when.ravel(), level.ravel(), tone.ravel(), 12 + 14 * size.ravel(), rise=0.029)


def grit(rate, spread_db, clump_db):
    """Tiny contacts of very uneven size that swell in clumps; rate is contacts a second."""
    size = amp(spread_db * rng.standard_normal(N) + clump_db * np.tanh(wobble(45)))
    return size * rng.standard_normal(N) * (rng.random(N) < rate / SR)


def scrape(moving, bodies, rate, spread_db, clump_db):
    """Dense grit shakes each (tones, level_db) body; the motion sets how loud."""
    def tone(hz, modes):
        return sum(amp(db) * 1j * hz * w / (c * c - hz * hz + 1j * hz * (w + RESTING_HZ))
                   for c, w, db in modes)

    def mix(hz):
        total = 0
        for modes, db in bodies:
            body = tone(hz, modes)
            total = total + amp(db) * body / np.sqrt(np.mean(abs(body) ** 2))
        return total

    return moving * filtered(unit(grit(rate, spread_db, clump_db)), mix)


def aftermath(s, db, fade_s):
    """Loudness curve of what each event leaves behind, dying away for up to a second or until the next cut."""
    power = np.zeros(N + SR)
    for when, peak in zip(s, db):
        t = np.arange(int(SR * min(1, until_cut(when)))) / SR
        power[int(when * SR):][:len(t)] += amp(peak - 60 * t / fade_s) ** 2
    return np.sqrt(power[:N])


def until_cut(when):
    """Seconds left until the next cut or the end."""
    return min(cut for cut in CUTS if cut > when) - when


def amp(db):
    """Decibels to a plain gain."""
    return 10 ** (np.asarray(db) / 20)


def unit(x):
    """Scale to an average (rms) level of 1."""
    return x / np.sqrt(np.mean(x ** 2) + 1e-20)


def sides(pan_db):
    """Left and right gains that differ by pan_db."""
    return amp(np.array([pan_db / 2, -pan_db / 2]))


def along(points, hz):
    """Read (pitch_hz, value) points on a log pitch axis."""
    f, v = np.transpose(points)
    return np.interp(np.log(hz + 1), np.log(f + 1), v)


def curves(rows, s):
    """Read each column after the time at times s."""
    when, *cols = np.transpose(rows)
    return [np.interp(s, when, c) for c in cols]


def wobble(rate):
    """A smooth random curve through rate random points a second."""
    return map_coordinates(rng.standard_normal(int(N * rate / SR) + 4), [np.arange(N) * rate / SR])


def filtered(x, response):
    """Weight each frequency of x by the response."""
    m = next_fast_len(N + SR // 2)
    return irfft(rfft(x, m) * response(np.fft.rfftfreq(m, 1 / SR)), m)[..., :N]


def scene():
    """Add ice, water and spoon, let the kitchen answer, thin the bass, then add the fridge."""
    ice = loading() + stirring()
    ice = filtered(ice, lambda hz: 1 / (1 + 1j * hz / 13000) ** 2)  # the microphone softens its top treble
    near = ice + pour() + spoon()
    heard = near + amp(-6.0) * sides(-0.46)[:, None] * kitchen(near.mean(0))
    thin_bass = lambda hz: (hz * hz / (hz * hz - BASS_HZ ** 2 - 1.3j * hz * BASS_HZ)) ** 2
    return filtered(heard, thin_bass) + fridge()


def record(dry):
    """Peaks are rounded off near full scale; nothing is kept above the band limit."""
    rounded = dry / (1 + dry ** 4) ** (1 / 4)
    return filtered(rounded, lambda hz: hz < TOP_HZ)


dry = scene()
out = record(dry)
dump(out)
```